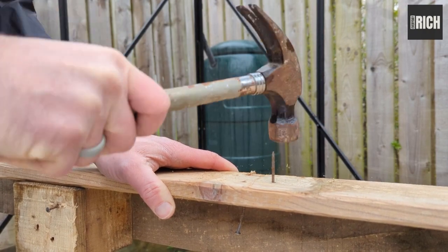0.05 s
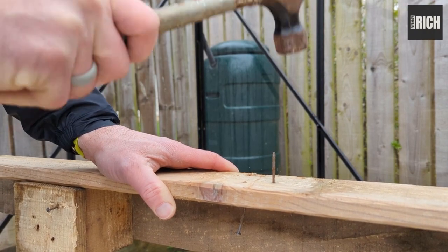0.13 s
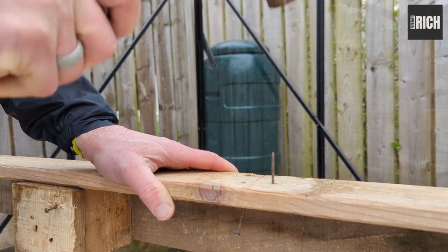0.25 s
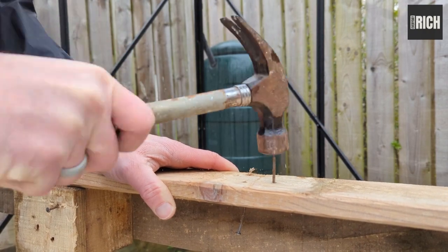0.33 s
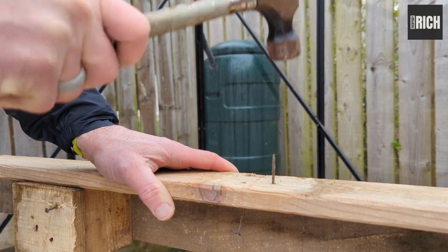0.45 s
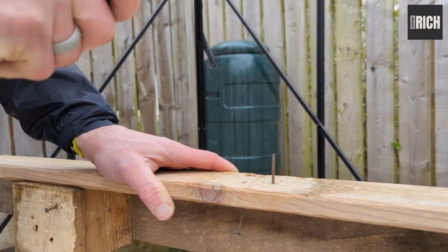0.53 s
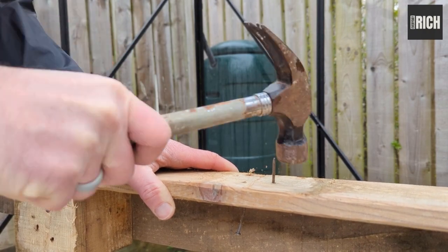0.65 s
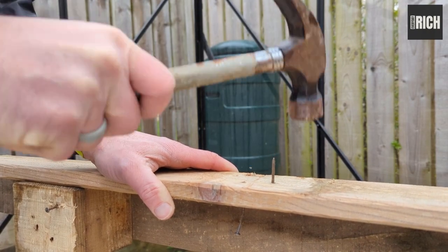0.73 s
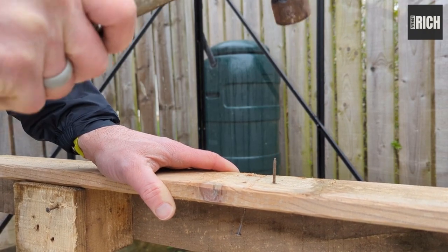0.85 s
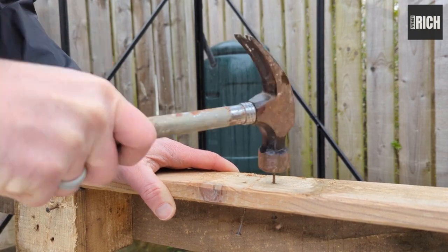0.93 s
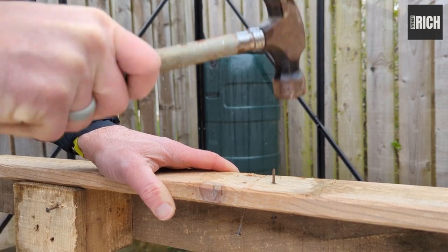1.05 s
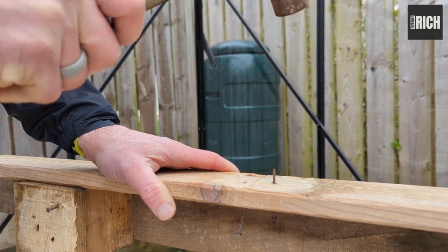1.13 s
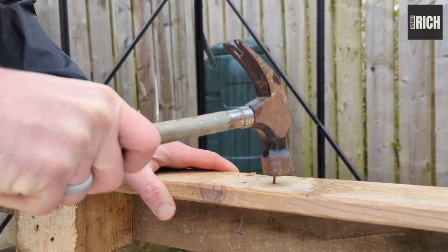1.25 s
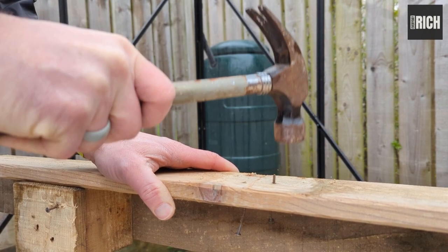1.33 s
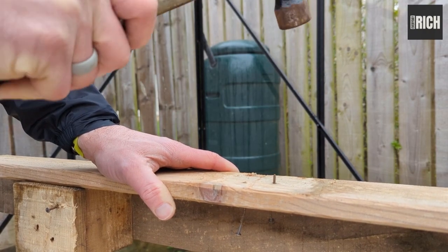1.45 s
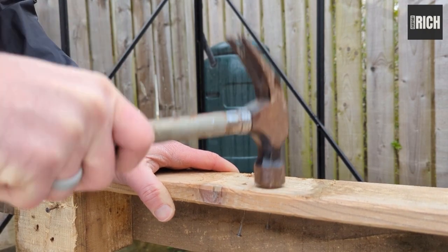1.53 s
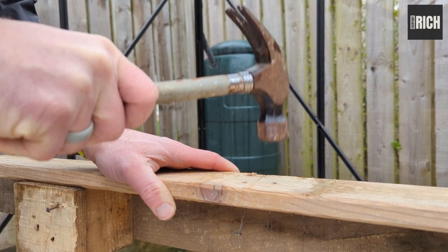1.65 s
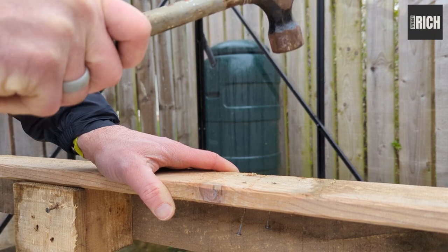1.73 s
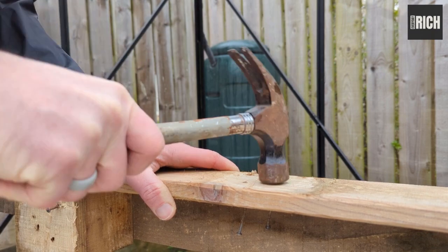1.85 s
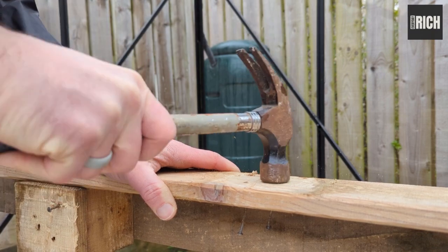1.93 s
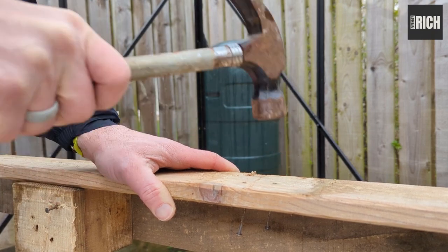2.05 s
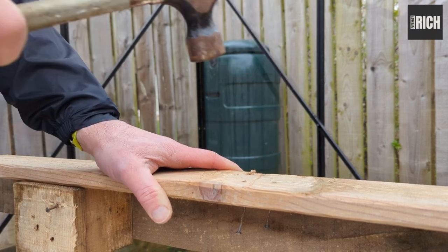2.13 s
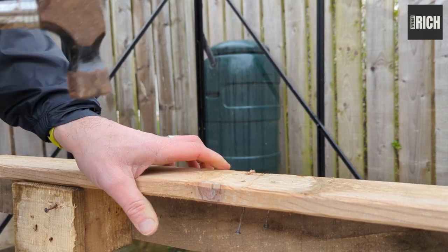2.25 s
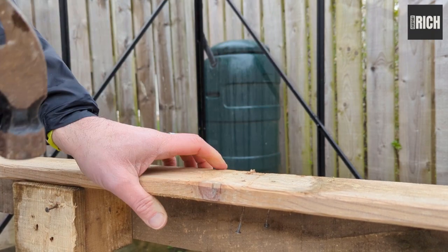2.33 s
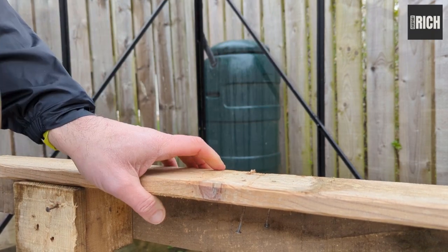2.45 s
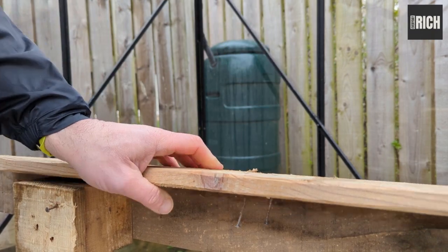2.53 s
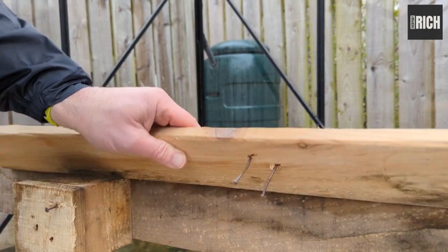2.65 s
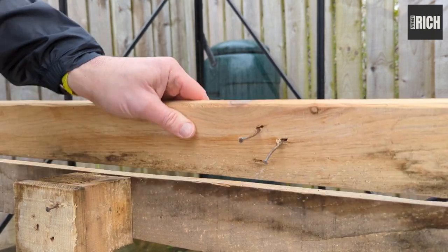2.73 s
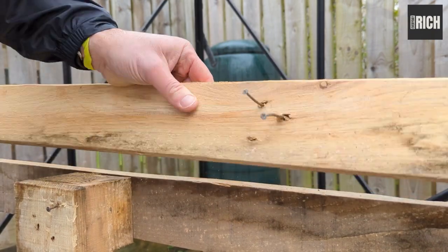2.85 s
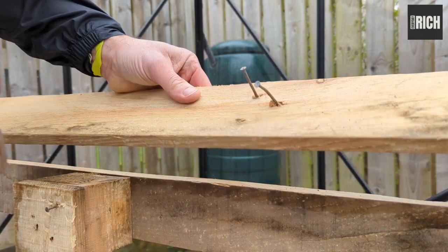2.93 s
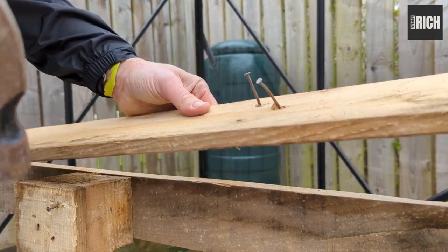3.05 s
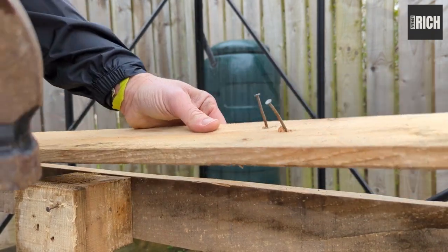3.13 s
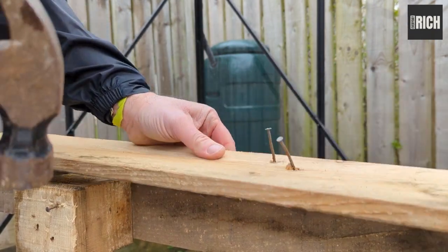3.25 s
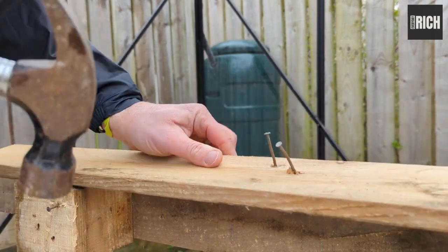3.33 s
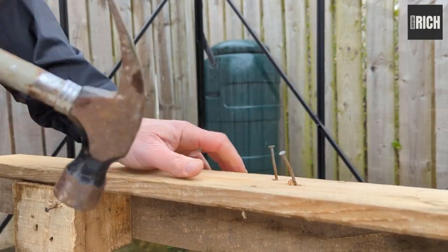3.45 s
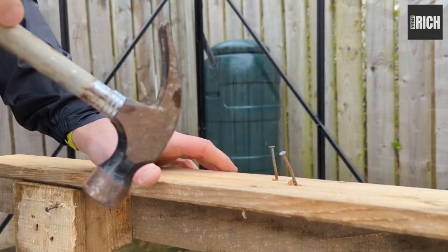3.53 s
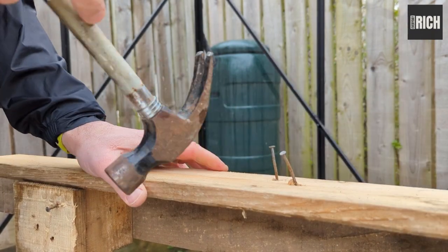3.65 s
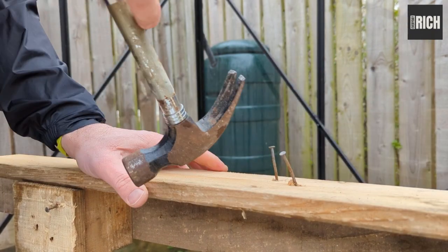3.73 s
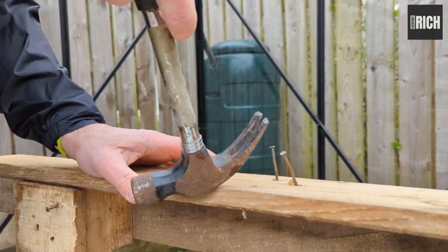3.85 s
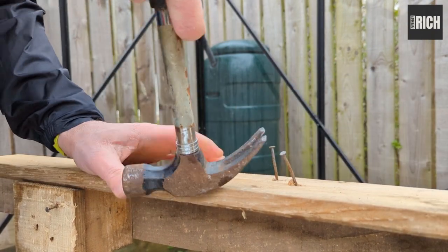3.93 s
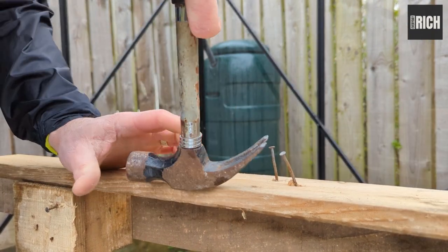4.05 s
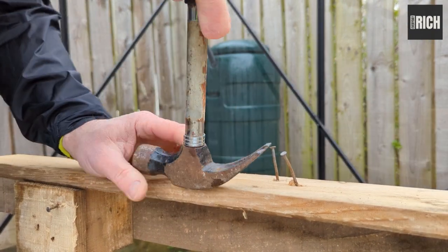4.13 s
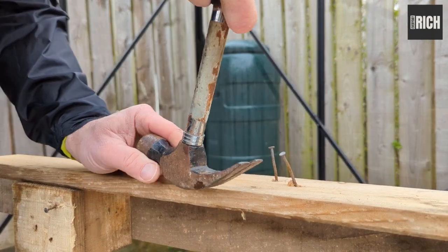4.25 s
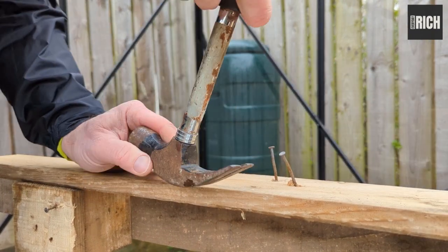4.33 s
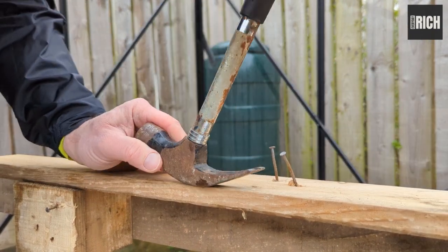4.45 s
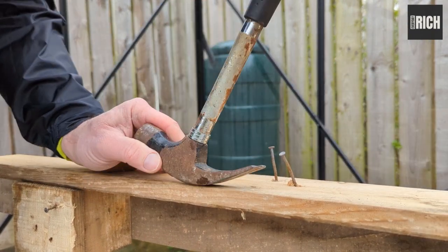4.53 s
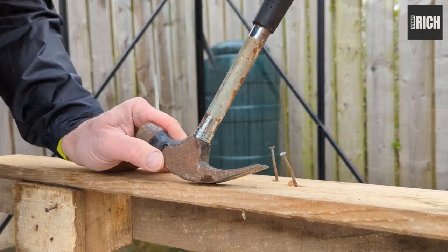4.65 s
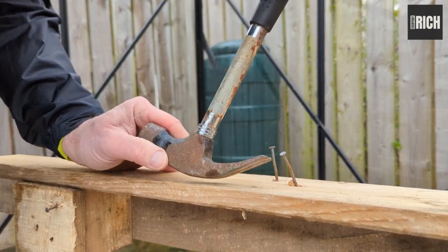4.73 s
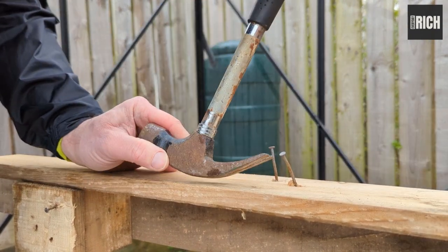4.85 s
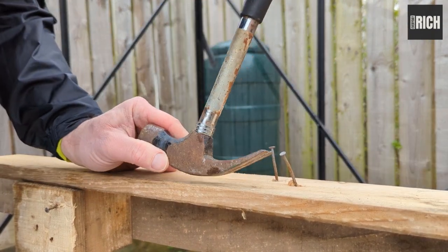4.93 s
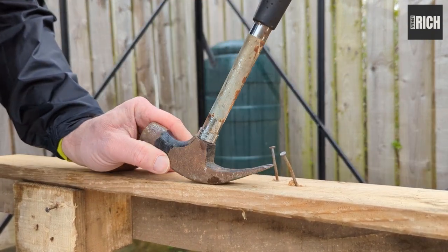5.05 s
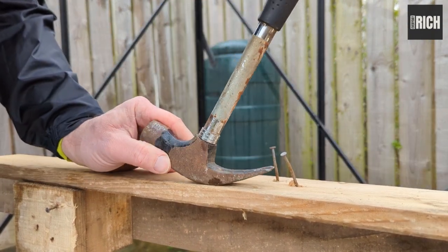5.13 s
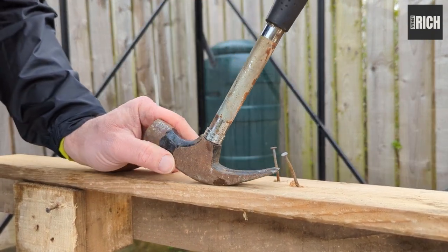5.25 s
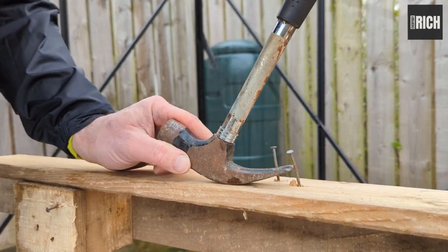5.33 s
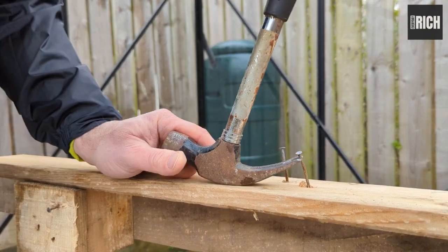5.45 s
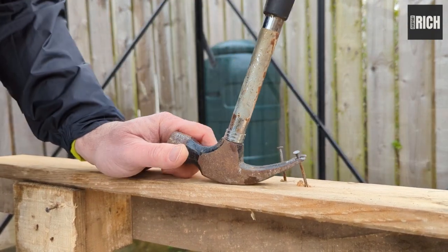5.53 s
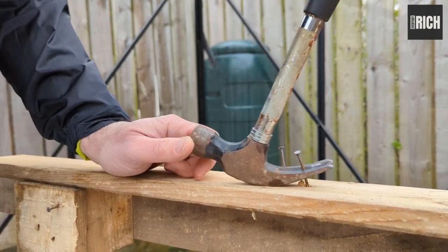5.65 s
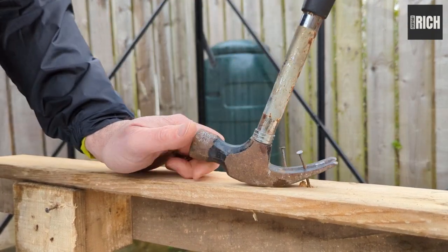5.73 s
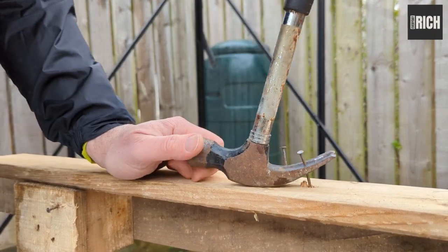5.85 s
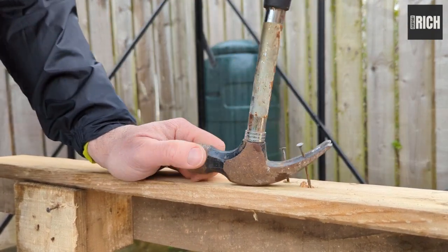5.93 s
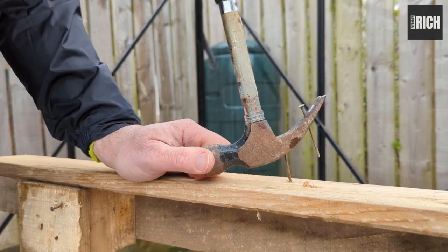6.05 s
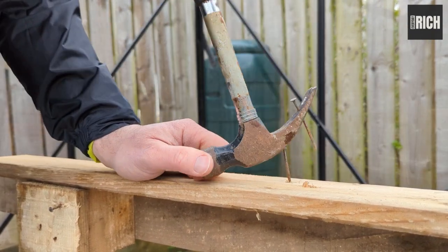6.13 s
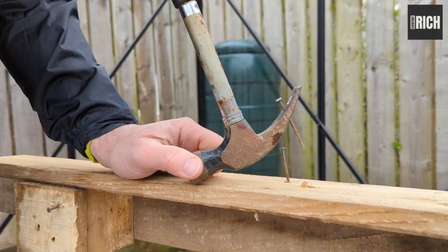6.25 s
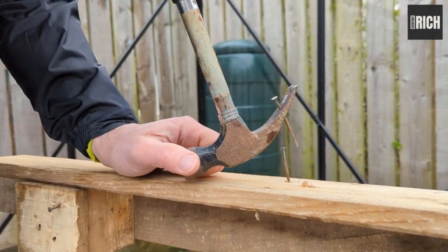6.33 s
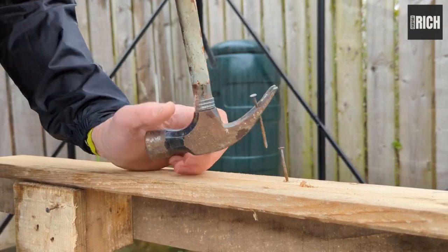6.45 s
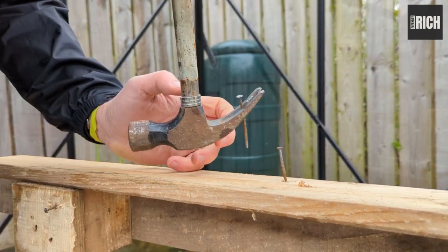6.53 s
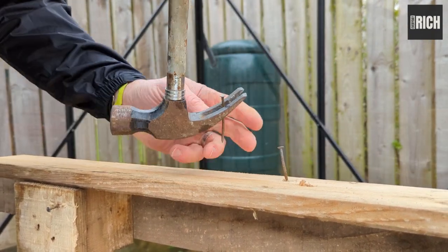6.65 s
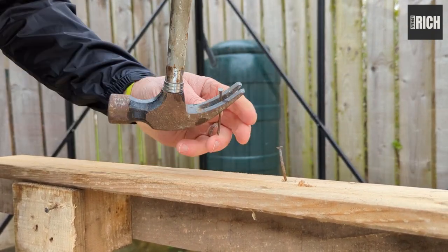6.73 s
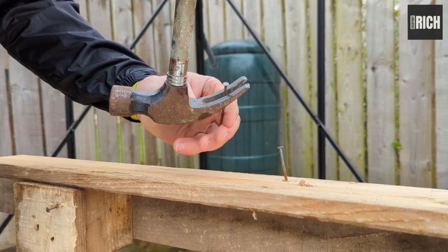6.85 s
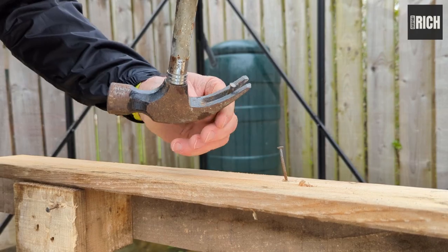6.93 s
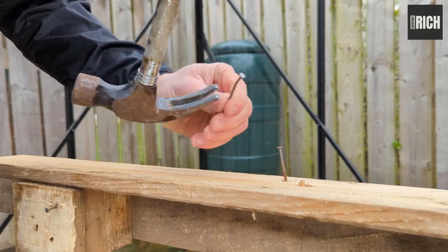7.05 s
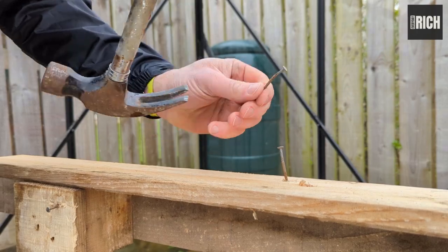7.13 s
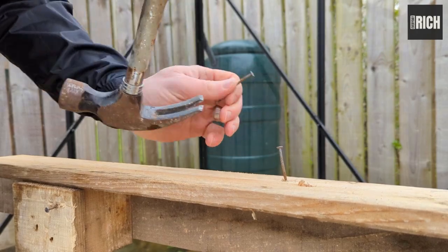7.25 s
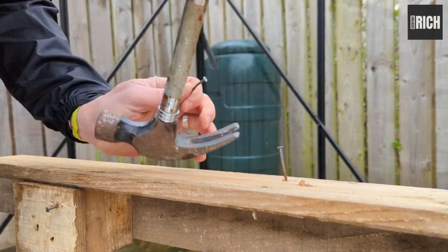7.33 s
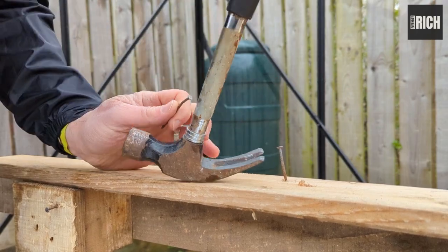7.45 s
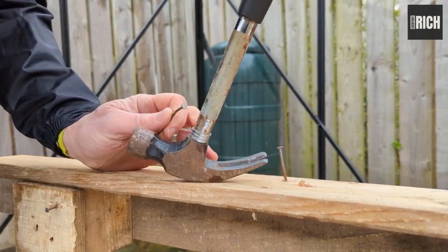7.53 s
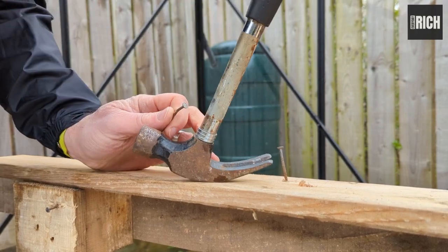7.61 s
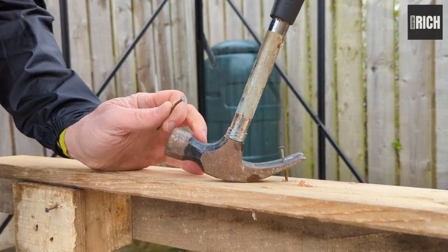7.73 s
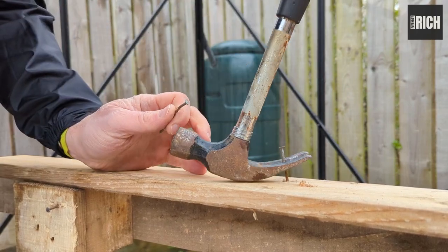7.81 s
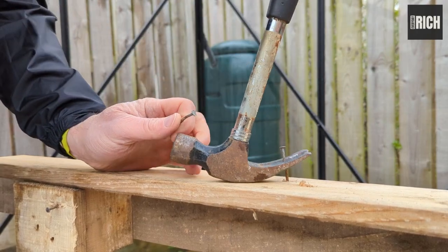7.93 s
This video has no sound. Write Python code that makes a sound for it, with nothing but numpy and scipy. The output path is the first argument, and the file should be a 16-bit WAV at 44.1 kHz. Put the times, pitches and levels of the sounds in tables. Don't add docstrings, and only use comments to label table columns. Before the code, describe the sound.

Outdoors, close up, with hard walls nearby and faint dull air throughout. The echo of an earlier blow is still dying as a hammer strikes a nail in a plank at 0.03, 0.35, 0.65, 0.95, 1.27, 1.57 and 1.88 seconds: sharp, dense woody cracks with short thick echoes, the fourth and fifth lighter, the last hardest and duller in the treble. From 2.2 to 2.9 hands brush the wood, with a soft knock at 2.5. The plank lands on its edge at 3.25, bounces at 3.34 and slaps flat at 3.4. Soft touches come at 3.9 and 4.5, and a faint falling squeak at 4.7. From 5.3 steel ticks and scrapes, swelling to a firm knock at 5.93 and a sharp gritty snap at 6.03. Quiet rustles and tiny pings follow, then a fresh scrape and ticks near 7.8.

```python
import sys
import numpy as np
from scipy import signal
from scipy.fft import rfft, irfft
from scipy.io import wavfile
from scipy.ndimage import uniform_filter1d, minimum_filter1d

SR = 44100
rng = np.random.default_rng(int(sys.argv[2]) if len(sys.argv) > 2 else 0)


def waveform_to_disk(signal):
    frames = np.transpose(np.atleast_2d(signal))
    scaled = np.clip(frames, -1, 1) * 32767
    samples = np.round(scaled).astype(np.int16)
    wavfile.write(sys.argv[1], SR, samples)


def voltage_ratio(decibels):
    exponent = np.asarray(decibels, float) / 20
    return 10 ** exponent


N = 351918
RUN_IN = int(.3 * SR)
STANCES = 3

# pitch_hz, level_db, t60_s
PLANK_MODES = [(142.45, -2, 0.66), (278.5, -8.5, 0.26), (310.5, -6.5, 0.23), (358, -1.5, 0.13),
               (430, -2, 0.16), (475, -12.5, 0.23), (575, -18, 0.08), (614, -7, 0.2), (728.6, 2.5, 0.057),
               (867.4, 4.5, 0.021), (1062, -0.5, 0.1), (1151, -7, 0.011), (1531, -1, 0.071),
               (1870, -18, 0.08), (2048, -9.5, 0.16), (2210, -5, 0.043), (2855, -8.5, 0.39)]


def rms_one(x):
    return x / np.sqrt(np.mean(x ** 2) + 1e-20)


def at_hz(points, hz, column=1):
    points = np.array(points)
    return np.interp(np.log(hz), np.log(points[:, 0]), points[:, column])


def band(x, low_hz, high_hz, order=2):
    return signal.sosfilt(signal.butter(order, [low_hz, high_hz], "band", fs=SR, output="sos"), x + 1e-18)


def ring(x, hz, t60_s):
    r, w = voltage_ratio(-60 / (t60_s * SR)), 2 * np.pi * hz / SR
    return signal.lfilter([0, np.sin(w)], [1, -2 * r * np.cos(w), r * r], x + 1e-18)


def drift(rate_hz, size):
    knots = rng.standard_normal(400)
    return np.interp(np.arange(size) / SR * rate_hz, np.arange(400), knots)


def stereo_bands(size):
    # pitch_hz, correlation
    likeness = [(25, .6), (60, 0.95), (150, 1), (300, 0.47), (600, 0.59), (1200, 0.019), (4000, 0.079),
                (9000, 0.052), (14000, 0.054)]
    edges_hz = 28 * 2 ** np.arange(0, 9.4, .5)
    white = rng.standard_normal((2, 2, size))
    for k, (low_hz, high_hz) in enumerate(zip(edges_hz, edges_hz[1:])):
        mid, side = band(white[k % 2], low_hz, high_hz)
        hz = np.sqrt(low_hz * high_hz)
        alike = np.clip(at_hz(likeness, hz), -1, 1)
        yield hz, np.sqrt(1 + alike) * mid + np.sqrt(1 - alike) * side * [[1], [-1]]


def add(track, sound, s):
    i = RUN_IN + round(s * SR)
    track[i:i + len(sound)] += sound[:len(track) - i]


def strokes(rows, fade_db_s, dry_share=0):
    swell_db = 21
    t = np.arange(-RUN_IN, N + 64, 64) / SR
    peak_s, rise_s, hold_s, db, hiss_db = np.transpose(rows)[:, :, None]
    shape_db = -swell_db * np.maximum(peak_s - t, 0) / np.maximum(rise_s, .003)
    shape_db = shape_db - fade_db_s * np.maximum(t - peak_s - hold_s, 0)
    gain = voltage_ratio(db + dry_share * hiss_db + shape_db).sum(axis=0)
    return np.interp(np.arange(-RUN_IN, N) / SR, t, gain)


def rubbing_and_air():
    # peak_s, rise_s, hold_s, level_db, hiss_rel_db
    brushes = [(2.2, .1, 0.017, -47.5, -5), (2.308, 0.036, 0.015, -46.5, -4),
               (2.65, 0.045, 0.047, -48.5, -4), (2.912, 0.029, 0.024, -64, 2.5),
               (3.13, 0.3, 0.033, -70.5, -20.5), (3.6, 0.9, 0.18, -58, -2),
               (3.897, 0.023, 0.0064, -64, -0.5), (4.19, 0.26, 0.048, -53.5, -8.5),
               (4.39, 0.028, 0.033, -77.5, 11), (4.67, 0.2, 0.0096, -66.5, -6.5), (4.82, .1, 0.039, -84, 7),
               (5.12, 0.12, .02, -71, -8), (5.3, 0.068, .02, -66, -9), (6.475, 0.039, .01, -78, 6),
               (6.562, 0.029, 0.022, -62.5, 0), (6.68, 0.18, 0.042, -66, -29),
               (7.007, 0.013, 0.039, -78.5, 17), (7.2, .03, 0.017, -84, 9), (7.38, 0.24, 0.069, -79.5, 8),
               (7.715, 0.08, 0.0084, -59.5, -10.5), (7.97, 0.017, 0.06, -71, -16)]
    # peak_s, rise_s, hold_s, level_db, hiss_rel_db
    scrapes = [
        (5.345, 0.01, 0.046, -79, 21),
        (5.465, 0.024, 0.011, -69, 7),
        (5.7, 0.2, 0.0056, -51.5, -9.5),
        (5.836, 0.032, 0.013, -50.5, -8),
        (5.92, 0.01, 0.022, -43, -14.5),
        (6.035, .015, 0.013, -62.5, 13),
        (6.17, .05, 0.021, -73.5, 6.5),
        (7.762, 0.005, .07, -58, -5.5),
    ]
    # pitch_hz, density_db
    wood_rub = [(150, -31), (250, -6), (386, -20), (486, 1.5), (642, -14.5), (733, -10), (1250, -8.5),
                (1440, -2), (4500, -25.5), (5850, -50.5), (9900, -120)]
    # pitch_hz, density_db
    dry_rub = [(1760, -17.5), (3000, -6.5), (3680, 13.5), (3970, -6), (4350, -12.5), (6220, -9),
               (15100, -14.5), (16000, -15)]
    # pitch_hz, density_db
    air_colour = [(15, -36), (25, -12.5), (70, -1.5), (137, -10.5), (263, -24), (405, -1), (775, -28),
                  (2350, -8.5), (3720, -27), (6210, -22.5), (8140, -31), (8830, -37.5), (16000, -29)]
    air_db, fade_db_s, hiss_fade_db_s = -58, 104, 115
    size = N + RUN_IN

    brush, scrape = strokes(brushes, fade_db_s), strokes(scrapes, fade_db_s)
    hiss = strokes([*brushes, *scrapes], hiss_fade_db_s, dry_share=1)
    pressed = voltage_ratio(-11.5) * brush + voltage_ratio(9) * scrape + voltage_ratio(-67.5)

    wood = dry_noise = air = 0
    for hz, noise in stereo_bands(size):
        flicker = voltage_ratio(2.0 * drift(20, size))
        wood = wood + noise * flicker * voltage_ratio(at_hz(wood_rub, hz))
        dry_noise = dry_noise + noise * flicker * voltage_ratio(at_hz(dry_rub, hz))
        air = air + noise * voltage_ratio(at_hz(air_colour, hz) + 2.0 * drift(2.5, size))

    wood = rms_one(wood)
    rumble = rms_one(sum(voltage_ratio(db) * ring(air, hz, 0.3 * t60_s) for hz, db, t60_s in PLANK_MODES[:6]))
    resonance = rms_one(sum(voltage_ratio(db) * ring(wood, hz, 0.85 * t60_s) for hz, db, t60_s in PLANK_MODES[10:]))
    wood = rms_one(wood + voltage_ratio(-7.5) * resonance)
    rub = (brush + scrape + voltage_ratio(-85.5)) * wood
    rub = rub + voltage_ratio(-0.5) * hiss * rms_one(dry_noise) + voltage_ratio(-7.5) * pressed * rumble
    lumps = voltage_ratio(1.5 * drift(45, size))
    drone = rms_one(ring(air, 390, .08))
    return rub * lumps + voltage_ratio(air_db - 8.5) * (rms_one(band(air, 36, 17000)) + voltage_ratio(-11.0) * drone)


def squeak():
    start_s, length_s, hold_s, level_db = 4.72, .35, .12, -65
    start_hz, fall_hz_s, partner_above_hz, partner_db = 2640, 2700, 4000, -9
    track, t = np.zeros(N + RUN_IN), np.arange(int(length_s * SR)) / SR
    phase = 2 * np.pi * np.cumsum(start_hz - fall_hz_s * np.maximum(t - hold_s, 0)) / SR
    tone = drift(450, len(t)) * np.sin(phase)
    partner = drift(600, len(t)) * np.sin(phase + 2 * np.pi * partner_above_hz * t)
    tone = tone + voltage_ratio(partner_db) * partner
    add(track, voltage_ratio(level_db) * np.sqrt(np.hanning(len(t))) * tone, start_s)
    return track


def claw():
    # start_s, peak_db, ring_share_db
    ticks = [
        (5.3391, -35, 1),
        (5.3676, -46, -19),
        (5.4387, -35.5, 4),
        (5.4745, -41, -20),
        (5.6417, -41, -1),
        (5.693, -35.5, -5),
        (5.837, -33, -3.5),
        (5.9295, -34, -11.5),
        (7.7797, -36, -3.5),
        (7.792, -34, -4),
    ]
    # start_s, peak_db, pitch_hz, t60_s
    pings = [
        (5.8369, -44, 9020, 0.03),
        (6.0351, -36, 6350, 0.015),
        (7.0066, -53, 2320, .015),
        (7.6286, -52, 2100, .006),
        (7.004, -57, 5560, 0.06),
        (7.0595, -52, 5590, 0.06),
        (7.0895, -63, 5560, 0.09),
    ]
    # start_s, peak_db
    clicks = [(2.9745, -56.5), (3.2505, -34.5), (3.3398, -38), (3.5964, -46), (3.7044, -50.5), (3.894, -38),
              (5.3388, -35), (5.5138, -44.5), (5.6935, -37), (5.917, -31.5), (5.9968, -31), (6.0347, -24),
              (6.0594, -34), (6.2444, -44), (6.7396, -49.5), (7.0065, -43.5), (7.7618, -39.5),
              (7.8314, -44.5)]
    # pitch_hz, level_db, t60_s
    head_modes = [(1450, -11, .035), (2946, -9, 0.025), (4190, -13, 0.012)]
    tick_hz, tick_t60_s, tick_spread = 1905, .03, .025
    grit_hz, ping_share_db, ring_db = 2500, 3, -14.5

    track, t = np.zeros(N + RUN_IN), np.arange(int(.3 * SR)) / SR
    rows = [(s, db, tick_hz, tick_t60_s, share_db) for s, db, share_db in ticks]
    rows += [(*row, ping_share_db) for row in pings]
    rows += [(s, db, grit_hz, .001, -40) for s, db in clicks]
    for k, (s, db, hz, t60_s, share_db) in enumerate(rows):
        is_tick = k < len(ticks)
        chance = rng.standard_normal(len(t))
        click = band((t == 0) + 0.28 * chance * np.exp(-t / 0.0028), .5 * hz, 9500, order=1)
        rings = ring(click, hz * (1 + tick_spread * chance[9] * is_tick), max(t60_s, .001))
        if is_tick:
            for (mode_hz, mode_db, mode_t60_s), luck in zip(head_modes, chance[::-1]):
                rings = rings + voltage_ratio(mode_db + 4.3 * luck) * ring(click, mode_hz, mode_t60_s)
        add(track, voltage_ratio(db + 8.0) * (click + voltage_ratio(share_db + ring_db) * rings), s)
    return track


def causal_pulse(colour_db, chance, length_ms, size=4096):
    colour_hz = [35, 95, 160, 290, 550, 1150, 1900, 2900, 4000, 6000, 11000, 16000]
    hz = np.arange(size // 2 + 1) * SR / size + 1
    cepstrum = irfft(np.log(voltage_ratio(np.interp(np.log(hz), np.log(colour_hz), colour_db))))
    cepstrum[1:size // 2] *= 2
    cepstrum[size // 2 + 1:] = 0
    scatter = np.interp(np.sqrt(hz), np.linspace(0, np.sqrt(SR / 2), len(chance)), np.abs(chance))
    late_s = np.clip(length_ms, .3, 25) / 1000 * scatter * (1000 / np.maximum(hz, 300)) ** .3
    return irfft(np.exp(rfft(cepstrum) - 2j * np.pi * np.cumsum(late_s) * SR / size))


def contact(levels_db, length_ms, favoured_hz, ring_db, boom_db, deep_db, boom_t60_s, lead_db):
    base_db = [-28.5, -8, 3.5, -0.5, -1, 4, -4, -7, -5.5, -7.5, -8, -15.5]
    range_index = [5, 5, 1, 1, 0, 2, 3, 3, 4, 4, 4, 4]
    chance = rng.standard_normal(90)
    colour_db = np.add(base_db, np.take([*levels_db, levels_db[1] + deep_db], range_index))
    force = np.zeros(int(.7 * SR))
    force[:3000] = causal_pulse(colour_db, chance[30:], length_ms)[:3000] * np.hanning(6000)[3000:]
    modes = sum(voltage_ratio(db + 3.5 * luck) * ring(force, hz, t60_s)
                for (hz, db, t60_s), luck in zip(PLANK_MODES[1:], chance))
    width = 0.039
    favoured = band(force, favoured_hz * (1 - width), favoured_hz * (1 + width), order=1)
    boom = ring(force, PLANK_MODES[0][0], boom_t60_s)
    return force + voltage_ratio(lead_db) * favoured + voltage_ratio(boom_db + deep_db) * boom + voltage_ratio(ring_db) * modes


def soft_contact(db, levels_db, length_ms, hz, deep_db, boom_t60_s):
    return voltage_ratio(db + 29.5) * contact(levels_db, length_ms, hz, ring_db=-47.5, boom_db=-35.0, deep_db=deep_db,
                                    boom_t60_s=boom_t60_s, lead_db=8)


def soft_knocks():
    # start_s, level_db, thud_rel_db, hardness_rel_db, favoured_hz
    knocks = [(2.485, -33.5, -2.5, -16, 1050), (3.071, -51.5, 7, -5, 427),
              (3.143, -50.5, -10.5, -17.5, 420), (3.896, -39, 5.5, -8, 580), (4.465, -38.5, 6.5, -14, 300),
              (5.052, -46.5, 8.5, -17, 282.4), (5.411, -46, 13, 12, 432), (5.43, -31, -12, -22, 587),
              (5.696, -29, -1, -1, 1016), (5.848, -27, -5, -30, 292), (5.933, -20.5, -5, -3.5, 562),
              (6.031, -68, -4, -1, 1120), (6.242, -48.5, 0.5, -3, 421), (7.508, -54.5, 13.5, -7, 260),
              (7.788, -49, -2.5, 7.5, 1480)]
    track = np.zeros(N + RUN_IN)
    for s, db, thud_db, hard_db, hz in knocks:
        levels_db = [0, thud_db, hard_db, hard_db - 3, hard_db - 31]
        add(track, soft_contact(db, levels_db, 3.0, hz, deep_db=-9, boom_t60_s=.7), s)
    return track


def dropped_plank():
    # start_s, level_db, thud_rel_db, knock_rel_db, favoured_hz
    landings = [
        (3.25, -5.5, -7, -15.5, 1534),
        (3.34, -11.5, -4.5, -7, 440),
        (3.405, -10.5, -23, 2.5, 1500),
        (3.418, -8.5, -6, 3, 1140),
    ]
    track = np.zeros(N + RUN_IN)
    for s, db, thud_db, knock_db, hz in landings:
        levels_db = [0, thud_db, knock_db, knock_db - 3.5, knock_db - 23]
        add(track, soft_contact(db, levels_db, 4.0, hz, deep_db=-5.5, boom_t60_s=.33), s)
    return track


def hammer_blows():
    # start_s, level_db, thud_rel_db, crack_rel_db, favoured_hz
    blows = [
        (-.275, 6, -11, -9.5, 1120),
        (0.0341, 6, -10, -9, 1090),
        (0.345, 4.5, -10.5, -7, 1037),
        (0.6542, 2, -13, -5, 1196),
        (0.9547, -4.5, -13.5, -1.5, 1070),
        (1.274, -2.5, -8, -7, 1180),
        (1.5684, 8, -14.5, -10.5, 2000),
        (1.8765, 11.5, -13, -17, 1457),
    ]
    knock_db, clack_db, length_ms = -1.5, -0.5, 3.5
    reflection_s, reflection_db = .0048, -15.5
    tracks = np.zeros((STANCES, N + RUN_IN))
    for k, (s, db, thud_db, crack_db, hz) in enumerate(blows):
        levels_db = [0, thud_db, knock_db, clack_db, crack_db]
        blow = voltage_ratio(db + 24.5) * contact(levels_db, length_ms, hz, ring_db=-49.0, boom_db=-52.5,
                                        deep_db=0.5 + crack_db, boom_t60_s=PLANK_MODES[0][2], lead_db=-1.5)
        add(tracks[k % STANCES], blow, s)
        reflection = -voltage_ratio(reflection_db) * band(blow, 580, 4000, order=1)
        add(tracks[k % STANCES], reflection, s + reflection_s)
    return band(tracks, 55, 19000)


def walls(tracks):
    # pitch_hz, t60_s, level_db
    echo_bands = [(60, 0.87, -1.5), (145, 0.46, -7.5), (356, 0.53, -1.5), (1060, 0.51, -4),
                  (2430, 0.52, 2.5), (3730, 0.43, -3), (5540, 0.45, -2), (9400, 0.43, -12),
                  (16500, 0.27, -0.5)]
    echo_db, build_s = 8, 0.0023
    t = np.arange(int(.9 * SR)) / SR
    tails = 0
    for hz, noise in stereo_bands(STANCES * len(t)):
        decay_db = at_hz(echo_bands, hz, column=2) - 60 * t / at_hz(echo_bands, hz)
        tails = tails + noise.reshape(2, STANCES, -1) * voltage_ratio(decay_db)
    tails = tails * (1 - np.exp(-t / build_s))
    tails *= voltage_ratio(echo_db) / np.sqrt(np.sum(tails ** 2) / 2 / STANCES)
    out = np.zeros((2, tracks.shape[1] + len(t)))
    for k, x in enumerate(tracks):
        end = np.flatnonzero(np.abs(x) > 1e-9)[-1] + 1
        out[:, :end + len(t) - 1] += signal.fftconvolve(x[None, :end], tails[:, k])
    return out[:, :tracks.shape[1]]


def scene():
    left_db, left_lag_s = 1.06, -.0002
    background = rubbing_and_air() + squeak()
    steel = claw()
    soft = band(soft_knocks() + dropped_plank(), 21.7, 2600)
    hard = hammer_blows()
    near = hard.sum(axis=0) + soft + steel
    i = np.arange(len(near))
    right = np.interp(i + left_lag_s * SR, i, near)
    sent = hard.copy()
    sent[0] += voltage_ratio(-7) * soft + voltage_ratio(-7.5) * steel
    mix = np.array([near, right]) + walls(sent) + background
    return (mix * voltage_ratio(np.array([[left_db], [-left_db]])))[:, RUN_IN:]


def low_pass(x):
    return signal.sosfilt(signal.butter(12, 16980, fs=SR, output="sos"), x)


def record(dry):
    ceiling_db, release_db_s, ahead_s, attack_s = -1.5, 444.5, 0.004, 0.0014
    over_db = np.maximum(20 * np.log10(np.abs(dry).max(axis=0) + 1e-9) - ceiling_db, 0)
    slope_db = release_db_s * np.arange(N) / SR
    held_db = np.maximum.accumulate(over_db + slope_db) - slope_db
    early_db = -minimum_filter1d(-held_db, size=2 * int(ahead_s * SR) + 1)
    smooth_db = uniform_filter1d(early_db, size=int(attack_s * SR))
    return low_pass(np.clip(dry * voltage_ratio(-smooth_db), -.98, .98))


dry = scene()
out = record(dry)
waveform_to_disk(out)
```